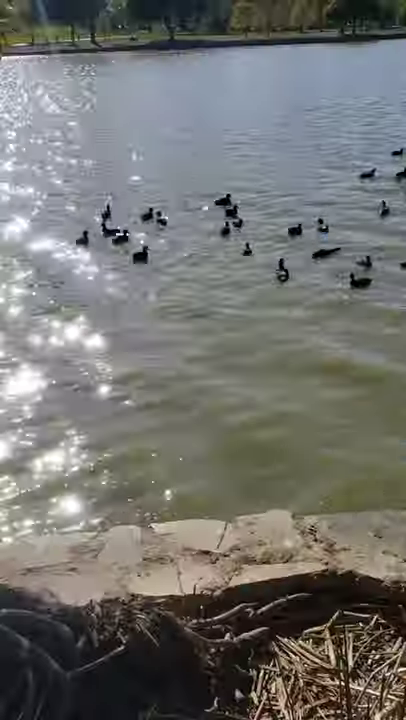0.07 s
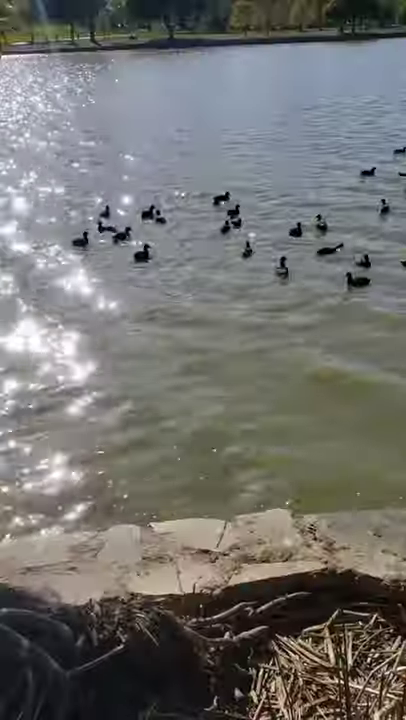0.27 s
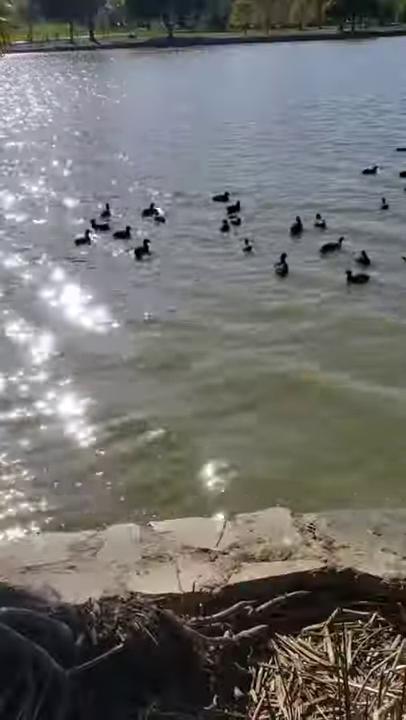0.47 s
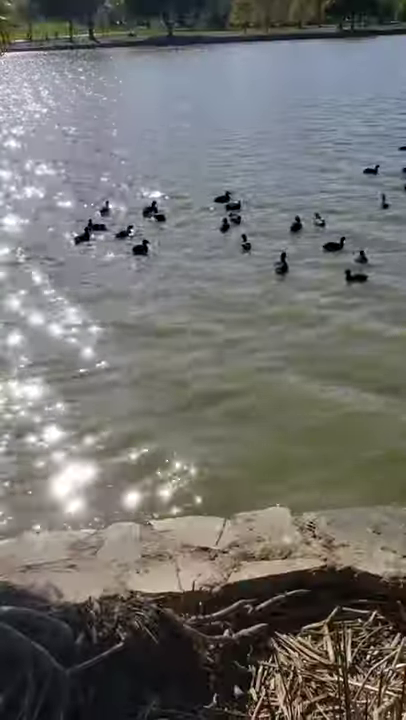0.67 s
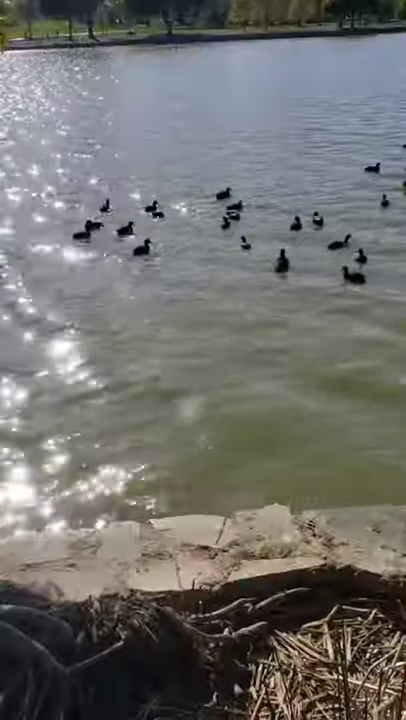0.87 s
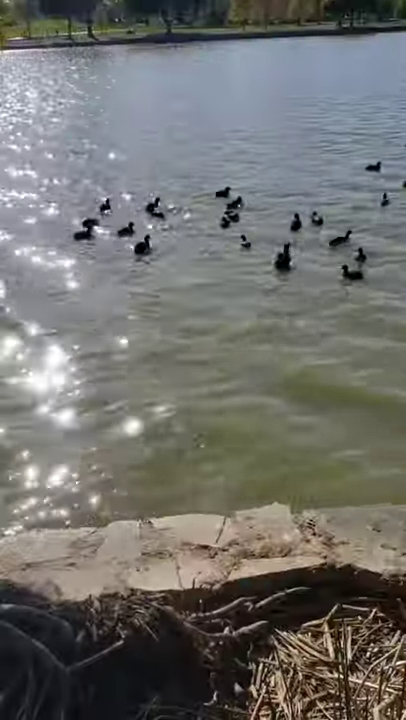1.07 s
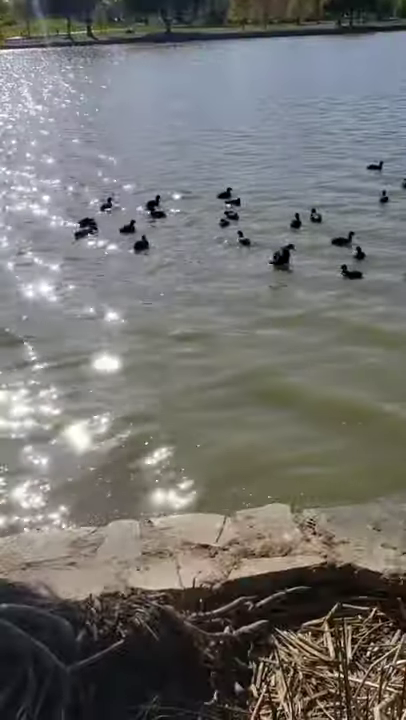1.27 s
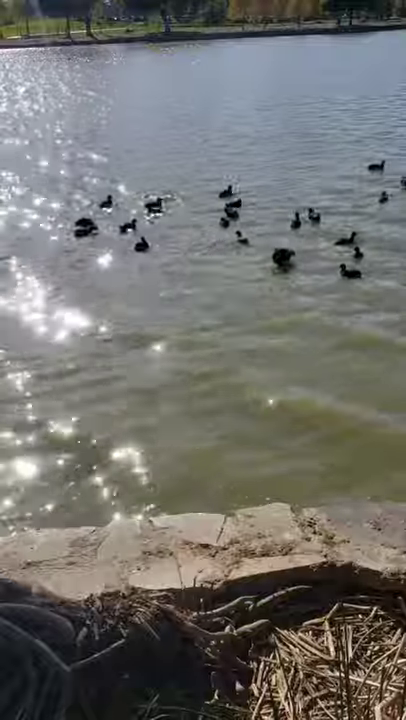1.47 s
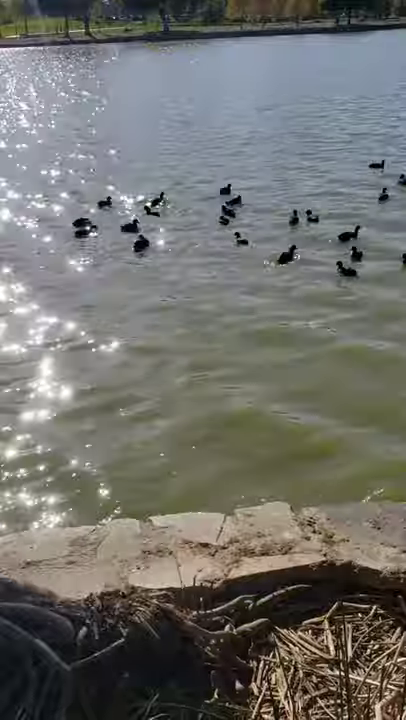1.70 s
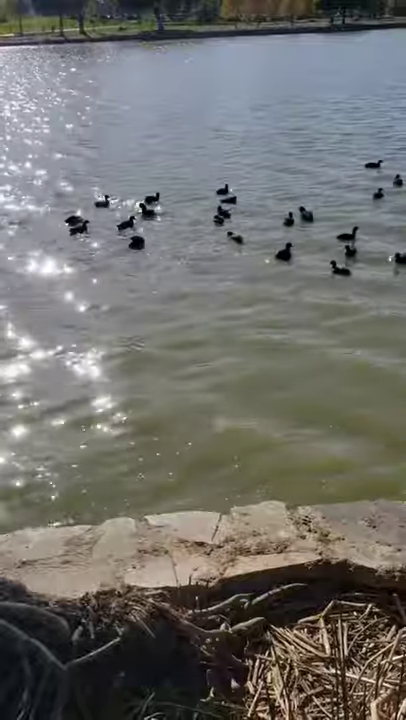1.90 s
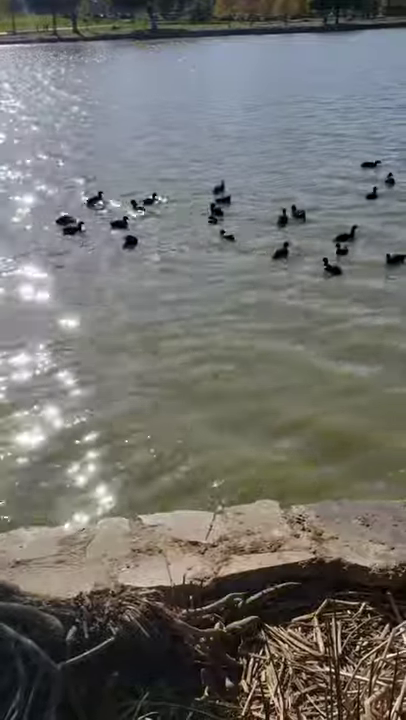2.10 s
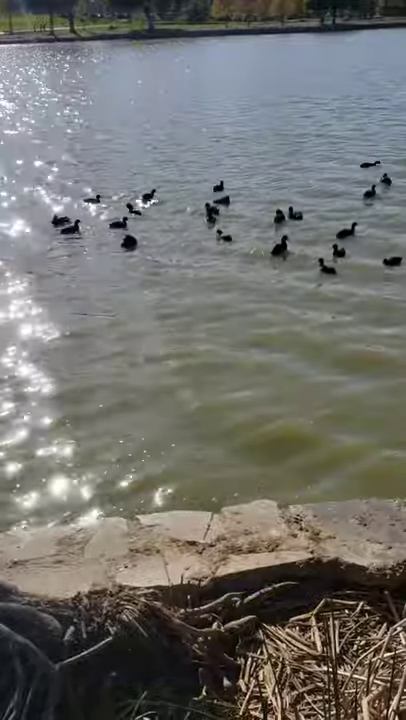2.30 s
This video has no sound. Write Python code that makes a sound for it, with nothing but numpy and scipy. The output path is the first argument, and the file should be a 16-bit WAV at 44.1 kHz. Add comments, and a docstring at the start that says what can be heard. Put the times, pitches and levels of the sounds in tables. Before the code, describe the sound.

A coot gives one short, nasal honk out on a lake, just after a gust of wind rumbles and thumps on the microphone. Small waves wash and splash softly on the stone bank, and distant birds call faintly.

```python
"""A coot honks once out on a lake: a rasping start, a clear nasal note that sags, and a cracked end
as the two sides of its syrinx fall out of step. The bank sends back a weak echo.
A gust rumbles and thumps on the two microphone ports, mostly the right one. Wavelets wash and splash
on the stone bank in spray and ringing drops, and other birds call faintly far away."""
import sys
import numpy as np
from scipy import signal
from scipy.fft import rfft, irfft, next_fast_len
from scipy.io import wavfile
from scipy.ndimage import uniform_filter1d, map_coordinates

SR = 44100
rng = np.random.default_rng(int(sys.argv[2]) if len(sys.argv) > 2 else 0)


def put_to_file(sound):
    """Save the sound as 16-bit audio at rate SR, in the file named by the first command-line argument."""
    columns = np.atleast_2d(sound).T  # one column per channel
    safe = np.clip(columns, -1, 1)
    whole_steps = np.round(safe * 32767)
    wavfile.write(sys.argv[1], SR, whole_steps.astype(np.int16))


N = 108045
TIME = np.arange(N) / SR
START_S, TOP_HZ = .092, 15850


def amp(db):
    """Decibels to gain."""
    return 10 ** (np.asarray(db) / 20)


def unit(x):
    """Scale to rms 1."""
    return x / np.sqrt(np.mean(x ** 2) + 1e-20)


def even(x, size):
    """Leveller: holds noise near rms 1 over spans of size samples."""
    power = uniform_filter1d(uniform_filter1d(x ** 2, size=size), size=size // 2)
    return x / np.sqrt(np.abs(power) + 1e-9)


def along(points, hz):
    """Read an EQ curve on a log frequency axis."""
    f, v = np.transpose(points)
    return np.interp(np.log(hz + 1), np.log(f + 1), v)


def curves(rows):
    """One envelope for each column after the time."""
    s, *cols = np.transpose(rows)
    return [np.interp(TIME, s, c) for c in cols]


def during(rows):
    """A soft gate, open from the first row to the last."""
    return uniform_filter1d(1. * ((TIME > rows[0][0]) & (TIME < rows[-1][0])), size=200)


def wobble(rate):
    """Smooth random modulation, rate knots a second."""
    return map_coordinates(rng.standard_normal(4000), [TIME * rate], mode="wrap")


def filtered(x, response):
    """Apply a frequency response to x."""
    m = next_fast_len(N + SR // 2)
    return irfft(rfft(x, m) * response(np.fft.rfftfreq(m, 1 / SR)), m)[..., :N]


def noise(spectrum, channels=2):
    """Coloured noise of rms 1, unrelated between channels."""
    return unit(filtered(rng.standard_normal((channels, N)), lambda hz: amp(along(spectrum, hz))))


def pan(db):
    """Channel gains for a left-minus-right level."""
    return amp(np.array([[db], [-db]]) / 2)


def lake():
    """The bed: wavelets wash unevenly over the low murmur of open air and a thin hiss."""
    wash_level = [(.1, -60.5), (.42, -56.5), (.7, -60), (1.25, -60.5), (1.45, -62.5), (1.8, -66.5),
                  (2.1, -64), (2.28, -67), (2.36, -62), (2.45, -68.5)]  # swell of the wavelets: t/s, level/dB
    # EQ of each layer: f/Hz, level/dB
    wash_eq = [(100, 5.5), (250, 2), (450, -3), (700, 8), (1000, 3), (1700, -3), (2400, -20.5),
               (4000, -18.5), (6000, -39)]
    hiss_eq = [(500, -18), (2000, 6.5), (3800, 0.5), (5000, -2), (6400, 3.5), (7500, 5.5), (8600, 0),
               (12500, 0.5), (15500, 2.5)]
    air_eq = [(30, -35), (120, 10.5), (400, 9), (600, -5.5), (1200, -59), (3000, -40)]
    wash = amp(curves(wash_level)[0] + 1.2 * wobble(22)) * noise(wash_eq) * pan(db=2)
    hiss = amp(-69 + .16 * wobble(30)) * noise(hiss_eq) * pan(db=3)
    murmur = amp(-56 + 1.8 * wobble(35.13)) * noise(air_eq)
    return wash + hiss + murmur


def far_birds():
    """Thin, wavering notes, blurred by the distance."""
    calls = [(1.238, 0.082, 1619, -63.5), (1.925, 0.086, 970, -64.5), (2.08, 0.16, 2130, -74),
             (2.215, 0.125, 2155, -69), (2.25, 0.15, 1660, -70.5)]  # one note a row: t/s, length/s, f/Hz, level/dB
    stereo_phase = np.array([[1.3], [0]])
    out = np.zeros((2, N))
    for s, length, hz, db in calls:
        phase = 2 * np.pi * np.cumsum(hz * (1 + .017 * wobble(300))) / SR
        swell = np.sin(np.pi * np.clip((TIME - s) / length, 0, 1))
        out += amp(db + 1.5 * wobble(120)) * swell * np.sin(phase + stereo_phase)
    return out


def splashes():
    """Each splash on the bank is a puff of spray and a scatter of tiny ringing drops."""
    hits = [(0.141, -51.5, .02, 825, 0.12), (0.215, -71.5, 0.091, 7000, 0.75),
            (0.371, -55.5, 0.044, 860, 0.19), (0.464, -71.5, 0.087, 6800, 0.16),
            (0.853, -68, 0.061, 7600, 0.18), (1.003, -67.5, 0.032, 2820, .12),
            (1.016, -67, 0.043, 5270, 0.51), (1.031, -75, .22, 5570, 0.4),
            (1.018, -74.5, 0.28, 13500, 0.23), (1.106, -75.5, 0.21, 11900, 0.44),
            (1.054, -74.5, 0.33, 2750, 0.28), (1.29, -72.5, 0.1, 7000, 0.17),
            (1.326, -69, 0.065, 4630, 0.35), (1.413, -76, 0.1, 11000, 0.41),
            (1.436, -50.5, 0.0076, 1170, 0.3), (1.667, -62.5, 0.0035, 7650, 0.25),
            (2.09, -68, 0.0058, 9200, 0.69), (2.305, -59, .17, 633, 0.54)]  # one splash a row: t/s, level/dB, length/s, centre/Hz, spread/octaves
    drops_per_s, ring_cycles, spray_share = 500, 23, .43
    out, age = np.zeros((2, N)), np.arange(600) / SR
    for s, db, length, hz, octaves in hits:
        rise = np.maximum(TIME - s, 0) / (length / 4)
        swell = rise * np.exp(1 - rise)
        band = lambda f: np.exp(-.5 * (np.log2((f + 1) / hz) / octaves) ** 2)
        spray = swell * unit(filtered(rng.standard_normal((2, N)), band))
        drops = np.zeros((2, N + SR))
        count = int(drops_per_s * length) + 2
        for when, pitch, size, side in rng.standard_normal((400, 4))[:count]:
            drop_hz = min(hz * 2 ** (.82 * octaves * pitch), TOP_HZ)
            at = int((s + length * min(.43 * np.exp(.64 * when), 2)) * SR)
            decay = amp(.4 * size - 60 * age * drop_hz / ring_cycles)
            drops[:, at:at + len(age)] += pan(5 * side) * decay * np.sin(2 * np.pi * drop_hz * age)
        drops = unit(drops[:, :N]) * np.sqrt(np.mean(swell ** 2))
        out += amp(db) * (spray_share ** .5 * spray + (1 - spray_share) ** .5 * drops)
    return out * pan(db=7)


def wind():
    """Each port rumbles with its own wind pressure; brighter eddies rise and fall with it."""
    # pressure on each port: t/s, level/dB
    gust_left = [(.1, -28.5), (.2, -37), (.37, -32.5), (.615, -39.5), (.645, -23.5), (.73, -21), (.82, -39),
                 (.91, -39), (1.15, -40), (1.3, -38.5), (1.48, -46), (1.77, -57), (1.82, -34.5),
                 (1.91, -44), (2.06, -62), (2.11, -33), (2.22, -65), (2.31, -41), (2.43, -41.5)]
    gust_right = [(.1, -32), (.18, -30), (.28, -31.5), (.39, -44.5), (.61, -36), (.66, -27), (.8, -23.5),
                  (.99, -23), (1.05, -33), (1.2, -27), (1.315, -30), (1.36, -65), (1.42, -43.5),
                  (1.7, -51.5), (1.86, -40.5), (1.95, -44.5), (2.29, -41), (2.37, -75)]
    # EQ of the rumbles and the eddies: f/Hz, level/dB
    left_eq = [(20, -35), (35, -13), (55, 10), (80, 3), (125, -5.5), (200, -21.5), (350, -37.5), (700, -51),
               (1500, -101)]
    right_eq = [(20, -19), (35, -70), (55, 0), (80, 6), (125, 1), (200, -13.5), (350, -29.5), (700, -51.5),
                (1500, -131)]
    eddy_eq = [(40, 11), (110, 5.5), (180, 4.5), (350, -6.5), (550, -22.5), (900, -33), (1600, -53),
               (4000, -105)]
    gust_db, eddy_growth, low_cut_hz = -21, .88, 38
    pressure_db = np.array(curves(gust_left) + curves(gust_right))
    rumble = np.vstack([noise(left_eq, channels=1), noise(right_eq, channels=1)])
    flutter_db = 2 * np.array([wobble(45.05), wobble(44.99)])
    eddy_gain = amp(-29 + eddy_growth * (pressure_db - gust_db) + flutter_db) * pan(db=-7)
    eddies = eddy_gain * even(noise(eddy_eq), size=900)
    air = amp(pressure_db + flutter_db) * even(rumble, size=3000) + eddies
    return filtered(air, lambda hz: hz ** 3 / np.sqrt(hz ** 6 + low_cut_hz ** 6))


def buffets():
    """Single eddies thump the right port; the smaller the eddy, the higher it reaches."""
    thumps = [(0.278, -36, 250), (0.724, -22, 275), (.749, -25, 255), (0.787, -26, 308),
              (0.808, -24.5, 320), (0.82, -23.5, 293), (.856, -36, 520), (0.871, -22, 300),
              (0.894, -20.5, 284), (.935, -25, 425), (0.974, -27.5, 358), (0.983, -21, 320),
              (1.021, -29.5, 420), (1.037, -27, 301), (1.1, -23, 254), (1.275, -34, 350), (1.87, -35, 128)]  # one eddy a row: t/s, level/dB, upper edge/Hz
    low_cut_hz, order, half_width_s = 90, 3.2, .014
    out = np.zeros((2, N))
    for s, db, edge_hz in thumps:
        low_cut = lambda hz: hz ** 2 / (hz ** 2 + low_cut_hz ** 2)
        high_cut = lambda hz: 1 / np.sqrt(1 + (hz / edge_hz) ** (2 * order))
        band = lambda hz: low_cut(hz) * high_cut(hz) * np.exp(-(hz / (3 * edge_hz)) ** 2)
        thump = even(filtered(rng.standard_normal(N), band), size=500)
        out[1] += amp(db) * np.exp(-2 * ((TIME - s) / half_width_s) ** 2) * thump
    return out


def shore_echo(call):
    """The bank sends back a weak, diffuse tail and one distinct slap."""
    echo_eq = [(1500, -7), (2400, -6), (3100, 2), (4500, -1)]  # tone of the reflections: f/Hz, level/dB
    t60_s, build_s, slap_s = .6, .013, .165
    t = np.arange(SR // 2) / SR
    tail = rng.standard_normal((2, len(t))) * amp(-60 * t / t60_s) * (1 - np.exp(-t / build_s))
    reverb = signal.fftconvolve(call[None], tail / np.linalg.norm(tail[0]), axes=1)[:, :N]
    slap = filtered(call, lambda hz: np.exp(-2j * np.pi * hz * slap_s))
    return filtered(amp(-17) * reverb + amp(-30) * slap, lambda hz: amp(along(echo_eq, hz)))


def rasp(phase, rough):
    """One partial; roughness smears it from a pure tone into a band."""
    rate = 590.4
    smear = (wobble(rate) + 1j * wobble(rate)) * np.exp(1j * wobble(rate))
    return ((np.sqrt(2 * (1 - rough)) + np.sqrt(rough) * smear) * np.exp(1j * phase)).real


def crack():
    """The two sides of the syrinx fall out of step: two unrelated tones and their sums."""
    glide = [(1.642, 1440, 1800, -78), (1.66, 1410, 1805, -60), (1.692, 1300, 1780, -65),
             (1.73, 1250, 1760, -79)]  # the two tones: t/s, lower/Hz, upper/Hz, level/dB
    partials = [(1, 0, -6), (0, 1, -2), (1, 1, -9), (2, 1, -16)]  # their mix: multiple of lower, multiple of upper, level/dB
    lower_hz, upper_hz, db = curves(glide)
    tones = np.zeros(N)
    for a, b, partial_db in partials:
        phase = 2 * np.pi * np.cumsum(a * lower_hz + b * upper_hz) / SR
        tones += amp(partial_db) * rasp(phase, rough=.4)
    return tones * amp(db) * during(glide)


def voice():
    """Harmonics through the throat; the rougher the voice, the more its pitch and level waver."""
    melody = [(1.41, 590), (1.43, 640), (1.452, 755), (1.48, 777), (1.525, 794), (1.54, 785), (1.555, 791),
              (1.586, 792), (1.6, 768), (1.615, 726), (1.645, 727), (1.667, 700)]  # the note scoops up, holds and sags: t/s, f/Hz
    honk = [(1.405, -80, .9, 0), (1.43, -66, .7, -2), (1.452, -62, .45, -3), (1.48, -59, .27, -1),
            (1.515, -57, .12, 1), (1.532, -54.5, .09, -2), (1.55, -51.5, .05, -19), (1.578, -50, .035, -32),
            (1.6, -52.5, .12, -36), (1.648, -50.5, .06, -32), (1.667, -68, .4, -28)]  # its envelopes: t/s, level/dB, roughness/0-1, odd harmonics/dB
    beak = [(1.43, -9), (1.5, -9), (1.525, -8), (1.542, -1), (1.578, -1), (1.6, -7), (1.62, -10),
            (1.65, -12)]  # the opening beak lifts the upper harmonics: t/s, level/dB
    throat = [(500, -38), (800, -28), (1200, -14), (1450, -1), (1580, 0), (1900, -3), (2400, -6),
              (2900, -7), (3150, -4), (3900, -5), (4350, -9), (4750, -22), (8000, -54)]  # resonances of the throat: f/Hz, level/dB
    waver, shimmer_db = .014, 3.5  # at full roughness
    pitch, = curves(melody)
    beak_db, = curves(beak)
    db, rough, odd_db = curves(honk)
    phase = 2 * np.pi * np.cumsum(pitch * (1 + waver * np.sqrt(rough) * wobble(160))) / SR
    out = np.zeros(N)
    for k in range(1, 11):
        shelf = np.clip((k * pitch - 2400) / 450, 0, 1)
        harmonic_db = along(throat, k * pitch) + shelf * beak_db + (k % 2) * odd_db
        out += rasp(k * phase, rough) * amp(harmonic_db)
    return out * amp(db + shimmer_db * np.sqrt(rough) * wobble(140)) * during(honk)


def coot():
    """The honk reaches the right port first but is louder on the left; its hoarse edge is diffuse."""
    hoarse_level = [(1.36, -90), (1.41, -69), (1.455, -63), (1.5, -63.5), (1.56, -81), (1.63, -76),
                    (1.675, -70), (1.72, -74.5), (1.8, -91)]  # noise at the attack and release: t/s, level/dB
    hoarse_eq = [(800, -33), (1400, -8), (2000, -1.5), (2600, -25), (3300, -4.5), (4200, -9), (5000, -18),
                 (7000, -32.5)]  # its tone: f/Hz, level/dB
    left_lag_s = .000355
    call = voice() + crack()
    direct = filtered(call, lambda hz: np.exp(1j * np.pi * hz * left_lag_s * np.array([[-1], [1]])))
    hoarse = amp(curves(hoarse_level)[0]) * during(hoarse_level) * noise(hoarse_eq)
    return pan(db=5) * (direct + hoarse) + shore_echo(call)


def scene():
    """The mix of wind, water and birds."""
    return wind() + buffets() + lake() + splashes() + coot() + far_birds()


def record(dry):
    """A moment of silence at the head, and a brick-wall high cut."""
    return filtered(dry * (TIME >= START_S), lambda hz: hz < TOP_HZ)


dry = scene()
out = record(dry)
put_to_file(out)
```